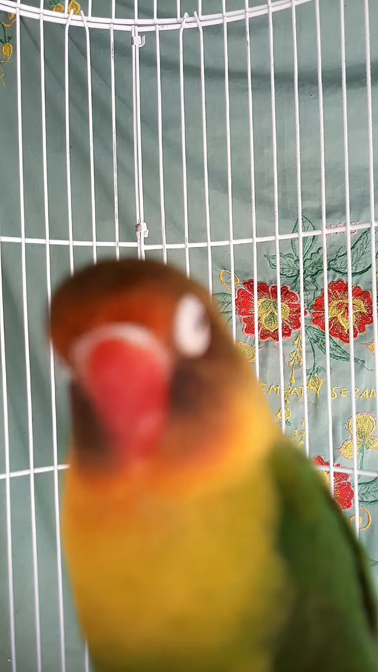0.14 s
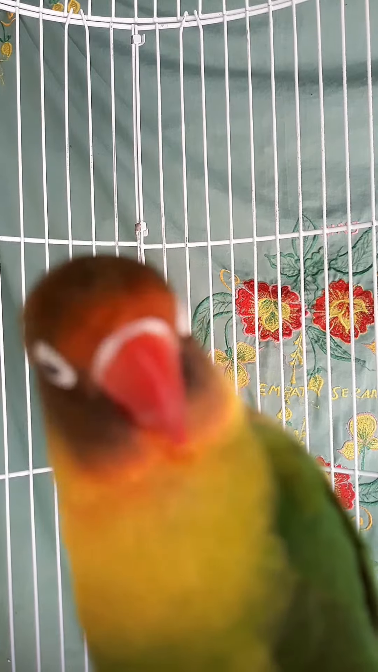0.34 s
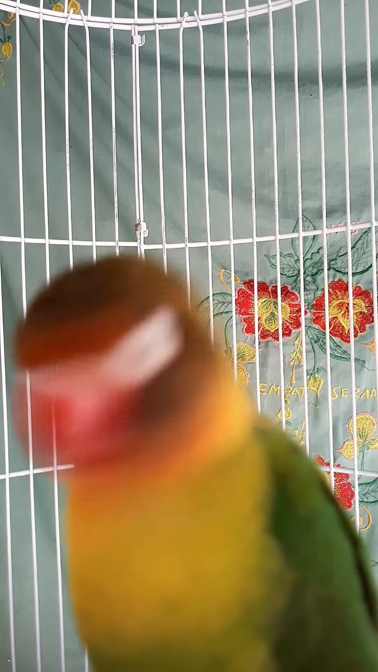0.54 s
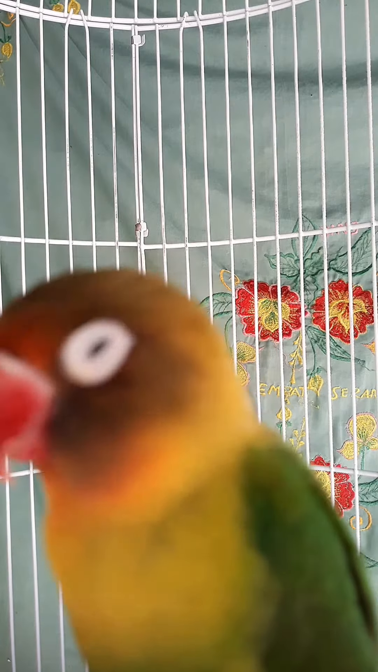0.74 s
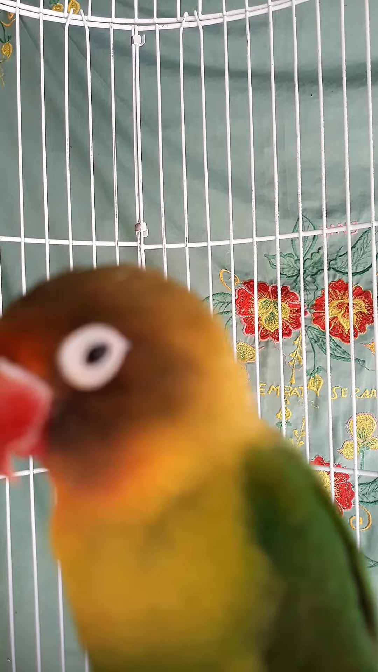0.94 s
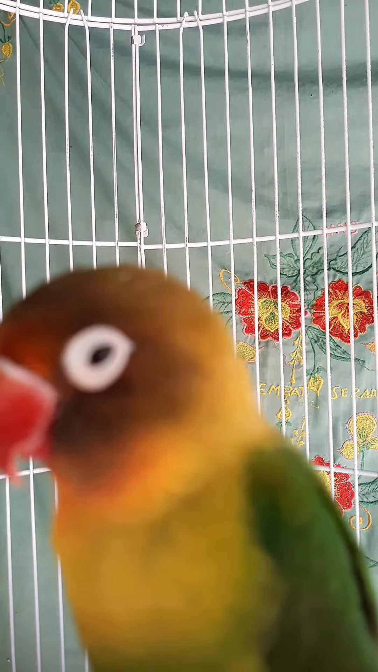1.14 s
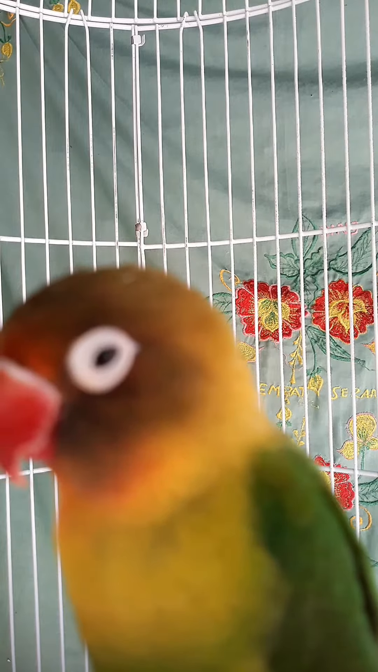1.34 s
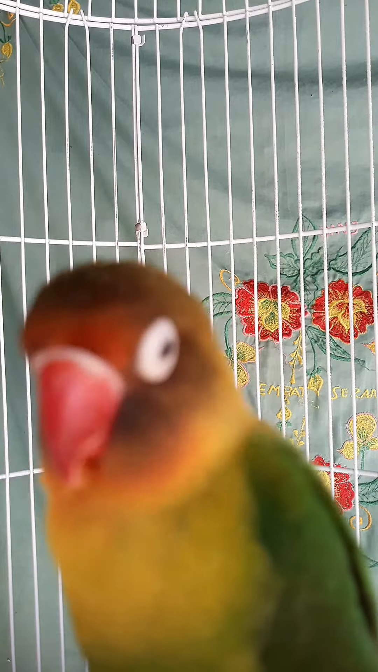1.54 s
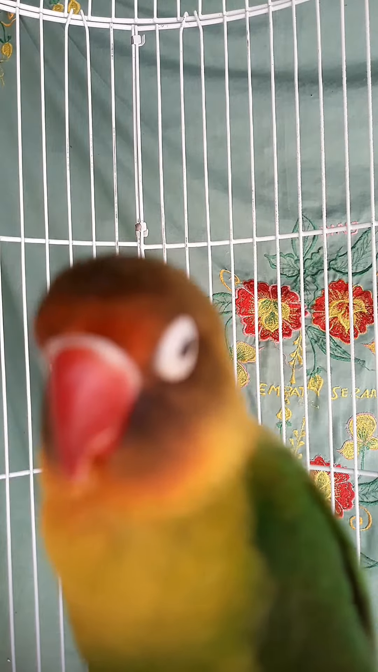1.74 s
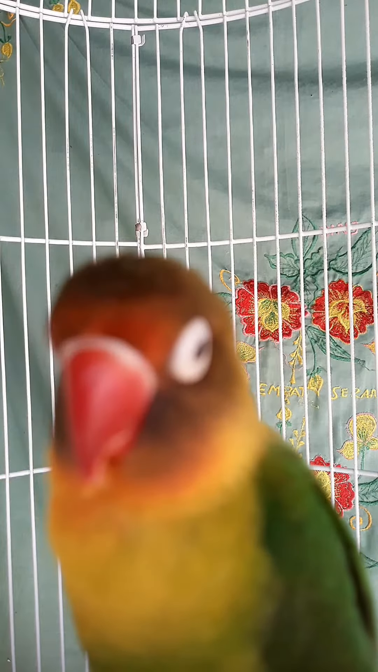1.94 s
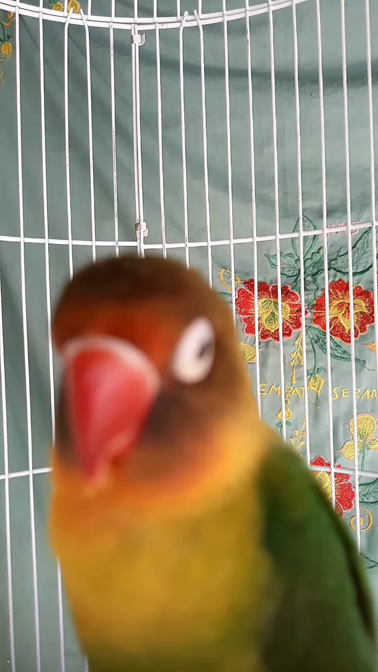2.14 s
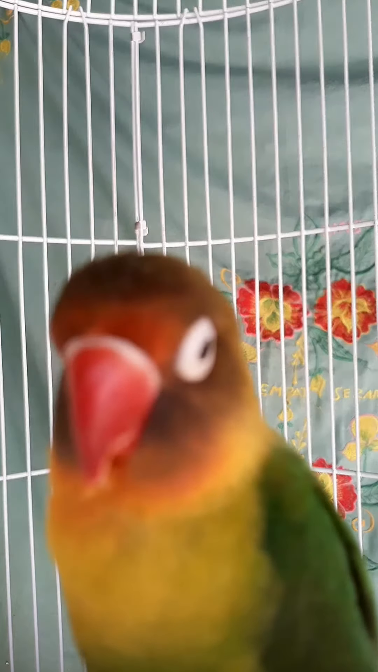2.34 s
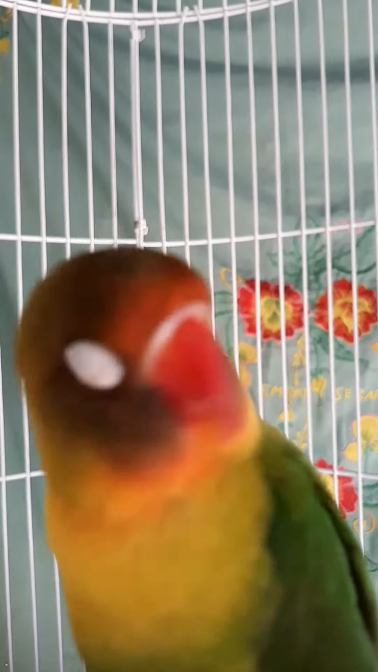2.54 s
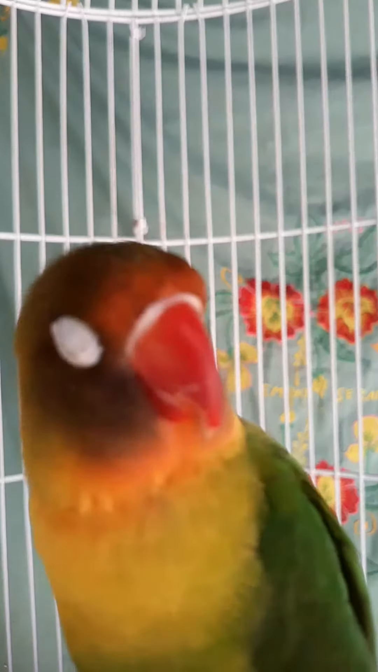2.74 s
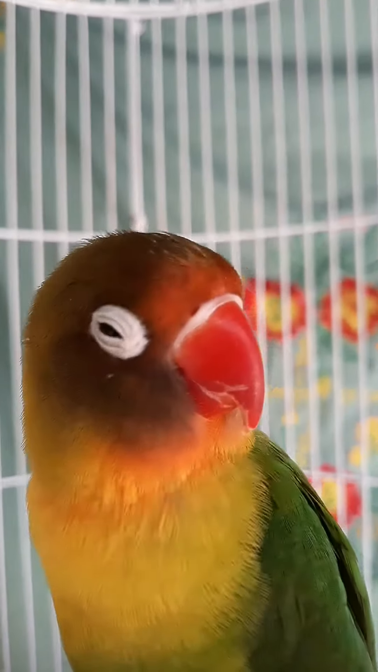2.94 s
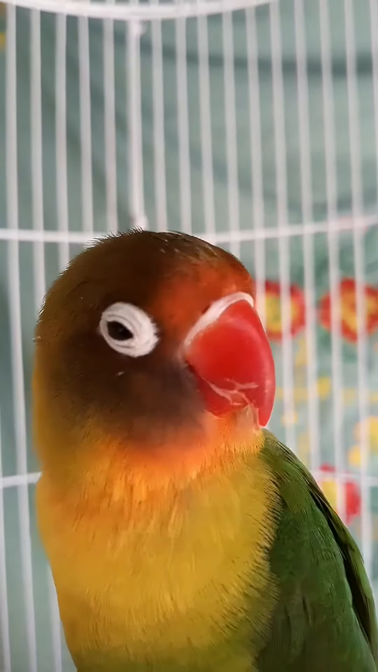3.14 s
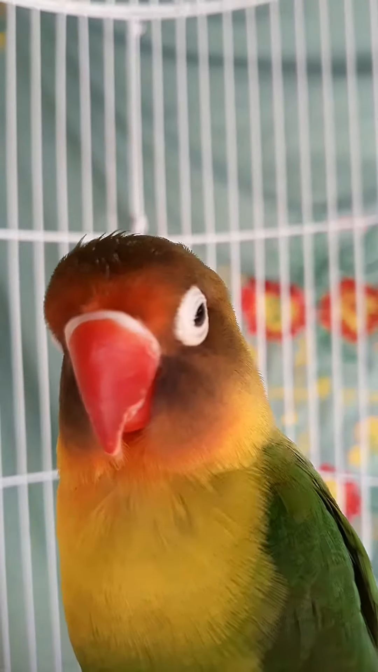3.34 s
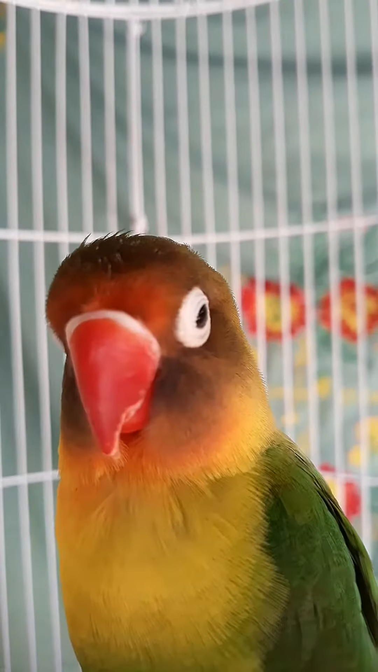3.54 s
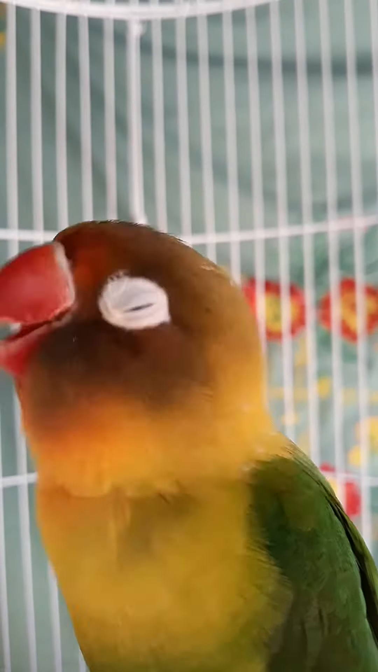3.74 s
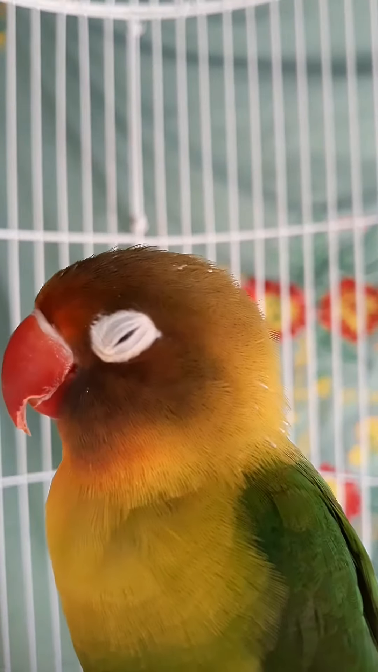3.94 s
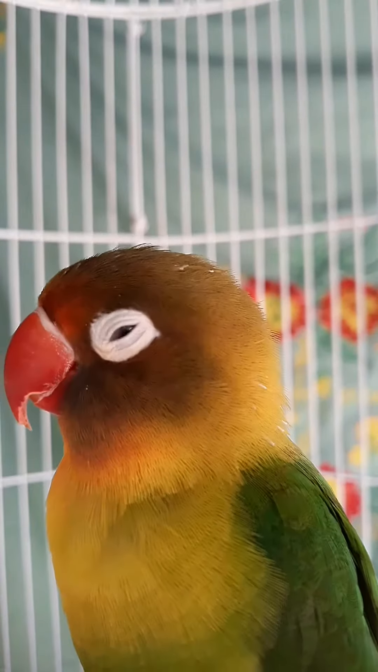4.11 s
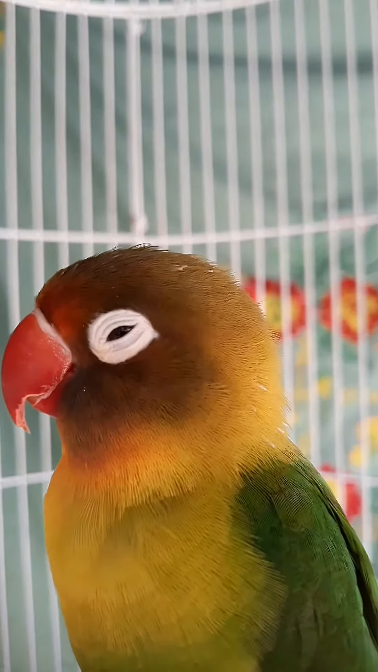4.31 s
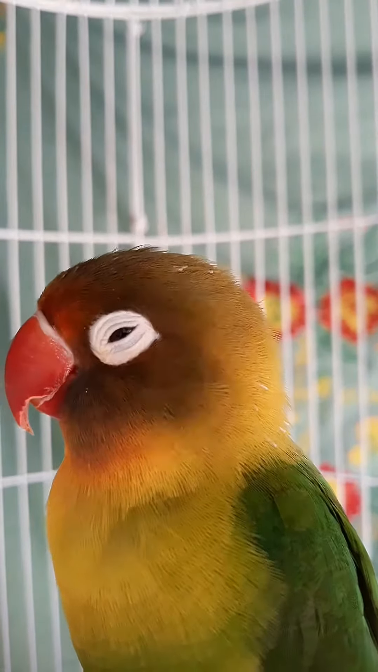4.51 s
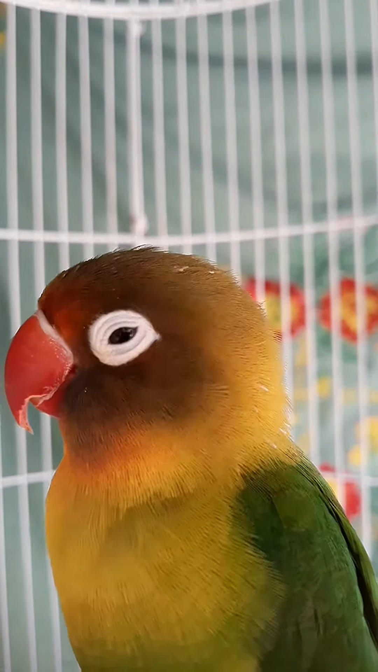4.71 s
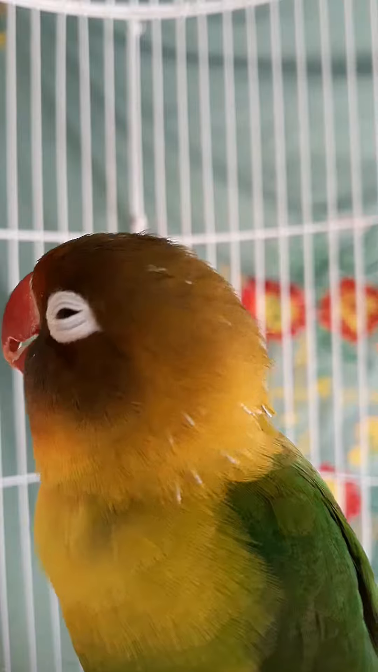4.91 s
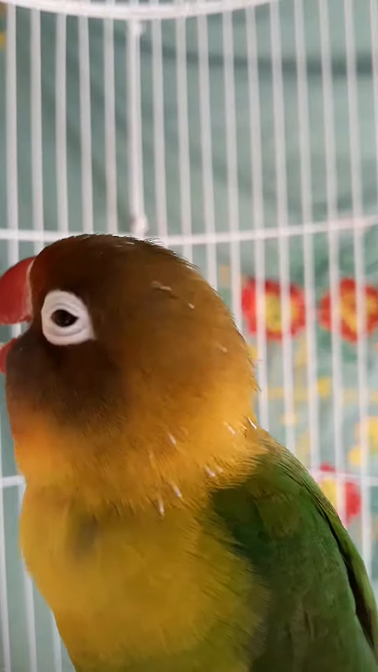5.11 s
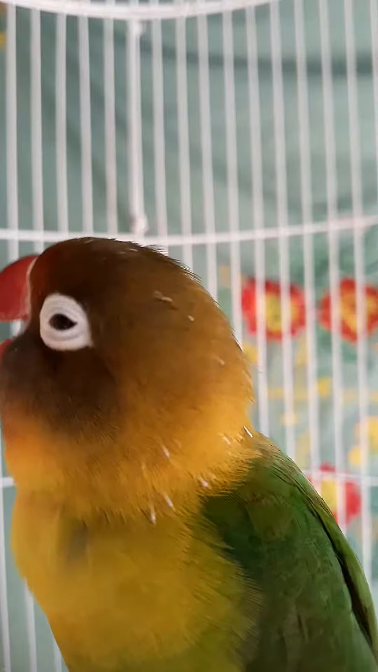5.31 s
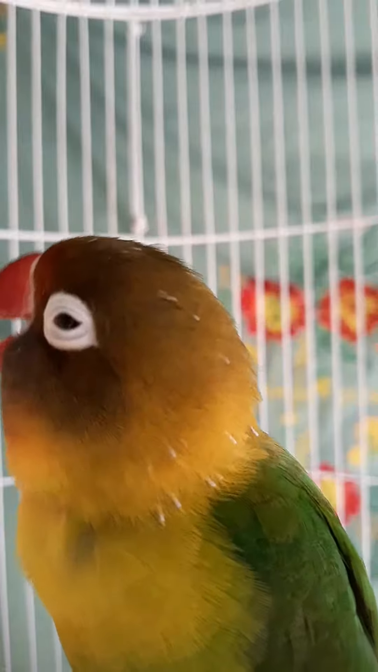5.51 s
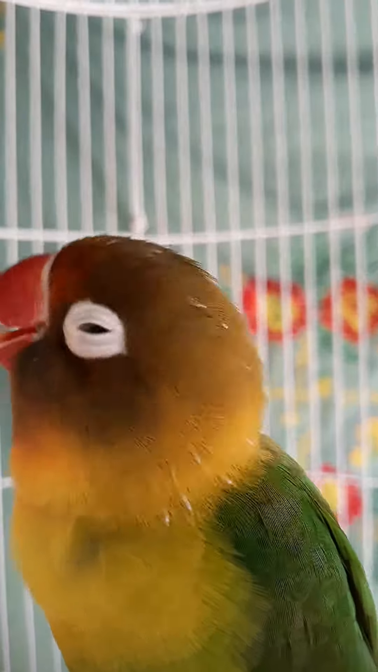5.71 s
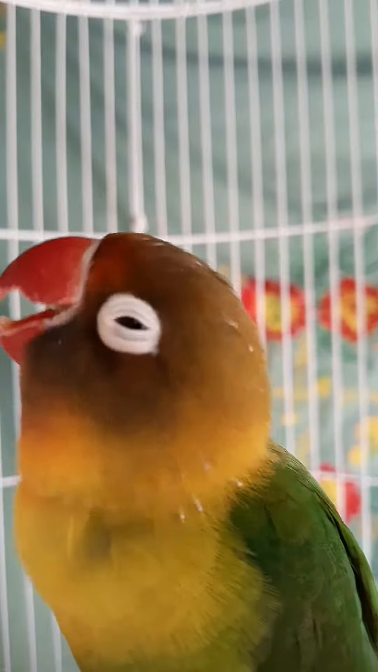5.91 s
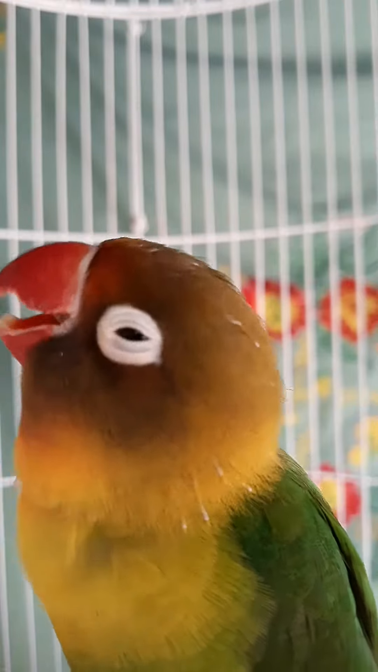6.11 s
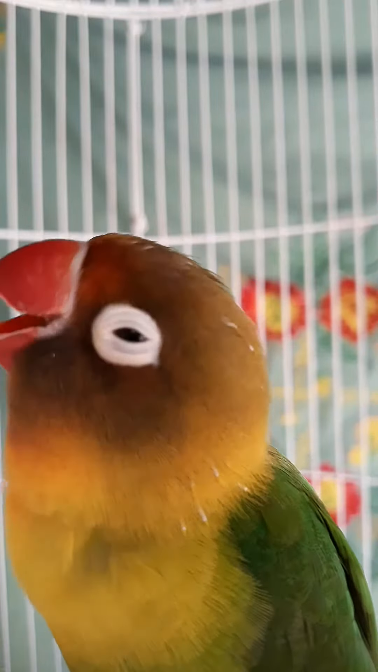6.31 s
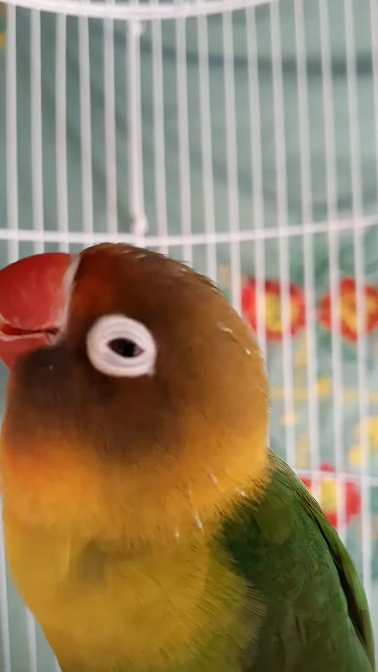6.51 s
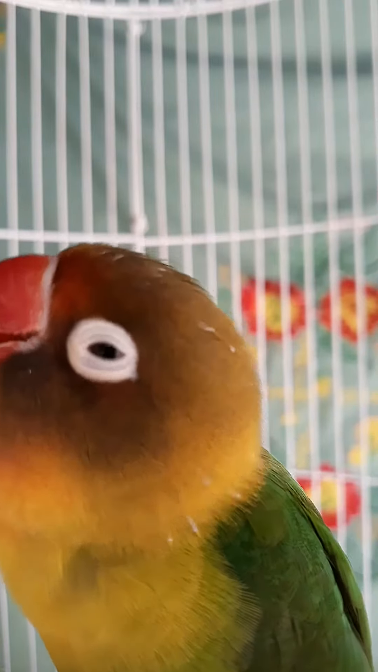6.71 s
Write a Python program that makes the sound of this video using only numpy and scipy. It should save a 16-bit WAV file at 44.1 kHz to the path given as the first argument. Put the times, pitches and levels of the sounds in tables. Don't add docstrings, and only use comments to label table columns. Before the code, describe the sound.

A small caged parrot calls right at the microphone, with short reflections off bars and cloth. Sharp whistled chirps, each about a twentieth of a second near 6 kHz, dipping then climbing, come at 0.7, 1.6 (softer), 2.6 (loudest) and 3.8 s. Behind them, very faint and echoey, distant birds whistle downward until about 4.5 s, a horn-like drone fades early, and dogs bark at 2.8 and 3.9 s. Thin insect tones, traffic rumble and breezy rustle continue; dull soft knocks fall near 1.3, 1.6, 2.1 and 3.7 s. At 4.85 s a squeaky leap leads into hard clicks, about sixteen per second. From 5.6 s they become a loud, rough trill alternating longer falling and shorter rising notes, about twenty-six notes per second. Around 6.65 s it breaks into ticks, ending abruptly with a bright rising chip at 6.8 s. Limiting flattens the calls and ducks the background.

```python
import sys
import numpy as np
from scipy import signal
from scipy.fft import rfft, irfft
from scipy.io import wavfile

SR = 44100
rng = np.random.default_rng(int(sys.argv[2]) if len(sys.argv) > 2 else 0)


def gain_from_db(level_db):
    decades = np.asarray(level_db, float) / 20
    return 10 ** decades


def digitize_waveform(pressure):
    field = np.atleast_2d(pressure).T
    bounded = np.clip(field, -1, 1)
    quanta = np.round(bounded * 32767).astype(np.int16)
    wavfile.write(sys.argv[1], SR, quanta)


N = 302526

# f/Hz, level/dB
THROAT = [(1300, -1.5), (2000, -15.5), (3000, -1.5), (4300, 7), (6000, -6.5), (8200, -9.5), (10000, -38),
          (12800, -15.5), (15500, -59)]
# f/Hz, level/dB
BEAK = [(1300, -31.5), (2600, -8), (4400, 8.5), (6000, 3), (9000, -12), (10300, -35), (13000, -7),
        (15500, -24)]


def parrot():
    voice = chirps() + rattle() + level_ticks() + falling_notes() + rising_notes()
    voice += long_notes() + last_note() + arch()
    port = signal.butter(3, [1250, 14500], "band", fs=SR, output="sos")
    overdrive_db = 11
    return gain_from_db(overdrive_db) * signal.sosfilt(port, voice)


def chirps():
    # t/s, peak level/dB, duration/ms, dip f/Hz, end f/Hz
    whistles = [
        (0.659, -0.5, 52.6, 5900, 6800),
        (1.6288, -6.5, 45, 5950, 6620),
        (2.622, 3, 53, 6030, 6420),
        (3.7722, -2.5, 48.4, 5600, 6750),
    ]
    # f/Hz, level re peak/dB, second voice level/dB
    openings = [
        (6564, -10.5, 0),
        (6283, -6, -3),
        (6250, -0.5, -2),
        (6210, -6, 3),
    ]
    dip_ms, climb_ms = 11.5, 20
    hook_hz, hook_ms = 300, 1.8
    low_ratio = 0.37
    out, air = np.zeros(N), coloured(BEAK, patchy_db=0)
    for (s, peak_db, length, dip_hz, end_hz), (open_hz, open_db, low_db) in zip(whistles, openings):
        ms = np.arange(int((length + 6) * SR / 1000)) * 1000 / SR
        since_dip = ms - dip_ms
        climb = end_hz + (dip_hz - end_hz) * np.exp(-since_dip / climb_ms)
        climb -= hook_hz * np.exp(-np.abs(since_dip) / hook_ms)
        fall = np.clip(since_dip / 2.5 + 1, 0, 1)
        hz = open_hz * (1 - fall) + climb * fall
        hz *= 1 + 0.008 * drift(210, count=len(ms))
        turns = 2 * np.pi * np.cumsum(hz) / SR
        whistle = np.sin(turns) + gain_from_db(-22 + 11 * ms / length) * np.sin(2 * turns)
        whistle *= gain_from_db(1.5 * drift(130, count=len(ms)))
        low_turns = 2 * np.pi * low_ratio * open_hz * ms / 1000
        beats = gain_from_db(-23) * np.sin(low_turns)
        beats += gain_from_db(-17.5) * np.sin(turns - low_turns)
        beats += gain_from_db(-27) * np.sin(turns + low_turns)
        beats *= np.clip((dip_ms - 2 - ms) / 1.5, 0, 1) * gain_from_db(low_db - 0.6 * ms)
        level_db = np.interp(ms, [0, 6, 9, 0.5 * length, length, length + 5],
                             [open_db, open_db, 0, -1, -6, -40])
        pop = gain_from_db(-9.5) * air[round(s * SR):][:len(ms)] * np.exp(-ms / 1.0)
        add(out, s, gain_from_db(peak_db) * (gain_from_db(level_db) * whistle + beats + pop))
    return out


def rattle():
    # t/s, peak level/dB, duration/ms, middle f/Hz
    click_rows = [(4.9893, -1.5, 3.5, 2247), (5.0495, 0, 4.9, 2050), (5.1111, -4, 3.9, 2041),
                  (5.176, -1.5, 3.8, 2610), (5.239, 0.5, 2.6, 2570), (5.3045, -1, 3.8, 2580),
                  (5.3708, 2.5, 7.9, 2293), (5.4356, -1, 6.8, 2350), (5.5074, 0.5, 4.3, 2386)]
    return calls(glides(click_rows, start=0.86, end=1.3), BEAK, count=6, turn=0.6, fade=0.1, rough=0.72,
                 pop_db=-5, pop_ms=1.86)


def level_ticks():
    # t/s, peak level/dB, duration/ms, middle f/Hz
    tick_rows = [
        (4.9261, -8, 3, 2620),
        (6.662, -13, 0.79, 1930),
        (6.6836, 1, 2, 1784),
        (6.7432, -13, 1.35, 1990),
        (6.771, 2, 3.7, 2149),
        (6.777, -1.5, 3.1, 2047),
    ]
    return calls(glides(tick_rows, start=1.03, end=0.99), THROAT, count=4, turn=0.57, fade=0.14, rough=0.64,
                 pop_db=-9, pop_ms=0.8)


def falling_notes():
    # t/s, peak level/dB, duration/ms, settled f/Hz, opening f/Hz
    down_rows = [(5.5807, -0.5, 8.7, 2200, 2410), (5.659, -3.5, 12, 2090, 2073),
                 (5.7362, -3, 6.8, 2230, 2514), (5.8096, -8, 13, 2000, 2937),
                 (5.8846, -0.5, 11, 2060, 2280), (5.9596, -0.8, 12, 2130, 2715),
                 (6.0314, 0.5, 18.5, 2160, 2490), (6.1171, -1, 14.4, 2082, 2460),
                 (6.196, -2, 9.9, 1970, 2220), (6.2739, 0, 8.9, 2020, 2080),
                 (6.3501, 1.5, 14.8, 1992, 2396), (6.4276, -2.5, 14.1, 2060, 2270),
                 (6.5129, 2, 19.4, 2140, 2305), (6.6024, 0, 11.4, 1900, 2495)]
    return calls(glides(down_rows, start=1, end=0.95), THROAT, count=7, turn=0.34, fade=0.14, rough=0.504,
                 pop_db=-10.0, pop_ms=0.43, ease=1.6, scoop=0.05)


def rising_notes():
    # t/s, peak level/dB, duration/ms, top f/Hz
    up_rows = [(5.6297, -3, 5.8, 1780), (5.709, -6, 4.4, 1687), (5.7841, -9, 2.9, 1774),
               (5.8564, 0.5, 5.9, 1922), (5.9302, 1, 5.8, 1896), (6.0072, -3, 8.5, 1844),
               (6.0908, -3, 4.4, 1850), (6.1669, -2, 5.1, 1895), (6.2468, -1.5, 6.1, 2045),
               (6.3227, -1, 4.52, 1900), (6.4007, -3, 6, 1720), (6.4836, -4.5, 7.8, 1790),
               (6.5734, 2, 3.7, 1980)]
    early = calls(glides(up_rows[:3], start=0.88, end=0.92), THROAT, count=8, turn=0.96, fade=0.2, rough=1.2,
                  pop_db=-18.5, pop_ms=1.7, rise_ms=0.39)
    later = calls(glides(up_rows[3:], start=0.9, end=1.06), THROAT, count=8, turn=0.87, fade=0.095, rough=0.62,
                  pop_db=-12.5, pop_ms=1.4, rise_ms=3.56, scoop=-0.14, ease=0.938)
    return early + later


def long_notes():
    # t/s, peak level/dB, duration/ms, settled f/Hz, opening f/Hz
    long_rows = [
        (4.854, -0.8, 9.4, 2570, 2505),
        (4.878, -4, 20, 2164, 2340),
        (6.690, 0.77, 17, 1990, 2990),
    ]
    return calls(glides(long_rows, start=1, end=0.95), THROAT, count=6, turn=0.58, fade=0.14, rough=0.55,
                 pop_db=-9, ease=2.2)


def last_note():
    # t/s, peak level/dB, duration/ms, settled f/Hz, opening f/Hz
    last_rows = [
        (6.779, 0, 11, 2443, 3020),
        (6.787, 1, 24, 2894, 2416),
    ]
    # f/Hz, level/dB
    open_beak = [(2000, -16), (2900, -9), (4600, -3), (5900, 3), (8600, -18.5), (10300, -32.5),
                 (12500, -15), (15500, -36)]
    return calls(glides(last_rows, start=1, end=1.01), open_beak, count=5, turn=0.55, fade=0.08, rough=0.3,
                 pop_db=-35, rise_ms=0.7, ease=1.5)


def arch():
    # t/s, peak level/dB, duration/ms, top f/Hz, opening f/Hz
    arch_rows = [
        (4.862, -2.5, 17.5, 6950, 3100),
    ]
    colour = [(2500, -3), (7200, 0), (10000, -30), (15000, -22)]     # f/Hz, level/dB
    return calls(glides(arch_rows, start=1, end=0.4), colour, count=2, turn=0.45, fade=0.1, rough=0.3,
                 pop_db=-40, rise_ms=1.5, ease=2.4)


def glides(rows, start, end):
    out = []
    for s, db, ms, hz, *opening in rows:
        open_hz = opening[0] if opening else hz * start
        out.append((s, db, ms, open_hz, hz, hz * end))
    return out


def calls(rows, colour, count, turn, fade, rough, pop_db, pop_ms=0.28, rise_ms=0.3, ease=1.3,
          waver_hz=500, scoop=0):
    out, air = np.zeros(N), coloured(colour, patchy_db=0, count=2 ** 15)
    for s, peak_db, ms, start_hz, turn_hz, end_hz in rows:
        size = int(ms * (1 + 3 * fade) * SR / 1000)
        part = np.arange(size) * 1000 / SR / ms
        before = np.clip(1 - part / turn, 0, 1)
        after = np.clip((part - turn) / (1 - turn), 0, 1)
        hz = turn_hz + (start_hz - turn_hz) * before ** ease + (end_hz - turn_hz) * after ** ease
        hz *= 1 + scoop * np.exp(-part * ms / 1.8)
        wobble = drift(waver_hz, count=6000)
        cycles = np.cumsum(hz * (1 + 0.034 * rough * np.resize(wobble, size))) / SR
        gains = [gain_from_db(at_hz(colour, k * hz)) for k in range(1, count + 1)]
        tone = sum(g * np.sin(2 * np.pi * (k + 1) * cycles + k) for k, g in enumerate(gains))
        tone = tone / np.sum(gains, axis=0) * gain_from_db(rough * np.resize(wobble[::-1], size))
        rise = np.minimum(part * ms / rise_ms, 1)
        shape = rise * np.exp(-np.maximum(part - 1 + fade, 0) / fade)
        burst = np.resize(np.roll(air, round(s * SR)), size)
        pop = gain_from_db(pop_db) * burst * np.exp(-part * ms / pop_ms)
        add(out, s, gain_from_db(peak_db) * (tone * shape + pop))
    return out


def echoes(x, near_db, far_db):
    cage_t60_s, room_t60_s = 0.038, 0.18
    hall_db, hall_t60_s = -17.5, 0.41
    t = np.arange(int(0.7 * SR)) / SR
    sparse = rng.standard_normal(len(t)) * (rng.random(len(t)) < 0.05) * (t > 0.0012)
    near = sparse * gain_from_db(-60 * t / cage_t60_s)
    dying = gain_from_db(-60 * t / room_t60_s) + gain_from_db(hall_db - 60 * t / hall_t60_s)
    dull = signal.lfilter([1], [1, -0.42], rng.standard_normal(len(t)))
    far = dull * dying * np.minimum(t / 0.0027, 1)
    tail = gain_from_db(near_db) * near / np.linalg.norm(near) + gain_from_db(far_db) * far / np.linalg.norm(far)
    return x + signal.fftconvolve(x, tail)[:N]


def distance():
    return echoes(far_birds() + far_barks() + drones(), near_db=-5.5, far_db=-1.5)


def far_birds():
    # t/s, peak level/dB, duration/ms, start f/Hz, end f/Hz
    bird_rows = [(.01, -53, 190, 4310, 2900), (.19, -56, 36, 4040, 3810), (.44, -48.5, 195, 3780, 2560),
                 (.73, -58, 97, 3430, 3586), (.84, -50.5, 193, 4007, 2457), (1.21, -54, 183, 4200, 2950),
                 (2.35, -49, 203, 4150, 2420), (2.73, -49, 177, 4060, 2455), (3.05, -57.5, 150, 4200, 3220),
                 (3.47, -46.5, 216, 4260, 2454), (3.85, -43.5, 210, 4120, 2450),
                 (4.06, -52.5, 50, 2850, 2850), (.44, -55.5, 93, 4170, 3340), (.83, -54, 64, 3720, 3850),
                 (2.35, -52.5, 100, 3750, 3270), (3.5, -51, 66, 3750, 3680), (4.24, -53, 91, 3290, 3204),
                 (4.38, -54.5, 124, 4120, 3030), (4.4, -54, 80, 3010, 2750)]
    fall_halfway = 0.62
    falls = [(s, db, ms, a, a + fall_halfway * (b - a), b) for s, db, ms, a, b in bird_rows]
    colour = [(2000, 0), (4500, 1.5), (5000, -15), (9500, -8.5)]     # f/Hz, level/dB
    return calls(falls, colour, count=2, turn=0.5, fade=0.087, rough=0.55, pop_db=-22.5, pop_ms=59,
                 rise_ms=7.5, ease=1.5, waver_hz=40.0)


def far_barks():
    # t/s, peak level/dB, duration/ms, lowest partial f/Hz
    bark_rows = [
        (2.79, -42.5, 59, 600),
        (3.86, -41.5, 67, 592),
        (3.98, -50, 85, 495),
    ]
    colour = [(400, -3), (1200, 0), (2000, -16)]     # f/Hz, level/dB
    return calls(glides(bark_rows, start=1.01, end=0.94), colour, count=3, turn=0.5, fade=0.2, rough=1.5,
                 pop_db=-5, pop_ms=40, rise_ms=8)


def drones():
    # t/s, peak level/dB, duration/ms, lowest partial f/Hz
    drone_rows = [
        (0, -55, 400, 376),
        (.5, -66, 550, 414),
        (2.95, -65.5, 181, 574),
    ]
    colour = [(350, -11.5), (750, -7.0), (1150, -7.5), (1500, 2.5), (1900, -24.5)]     # f/Hz, level/dB
    return calls(glides(drone_rows, start=1, end=0.985), colour, count=4, turn=0.89, fade=0.5, rough=0.16,
                 pop_db=-39, rise_ms=8)


def insects():
    # t/s, level/dB
    high_insect = [(.119, -58.5), (.62, -62.5), (.9, -59), (1.43, -55.5), (2.089, -56.5), (2.706, -59),
                   (3.199, -58.5), (3.75, -61), (4.214, -59.5), (4.697, -56.5), (5.377, -74), (6.1, -62)]
    # t/s, level/dB
    low_insect = [(.26, -57), (1.27, -56.5), (2.192, -61), (3.152, -56.5), (4.146, -57.5)]
    # f/Hz, bandwidth/Hz, level/dB
    chorus = [
        (3150, 120, -60),
        (5920, 170, -63),
        (12240, 650, -68),
        (79, 6.9, -63.5),
        (120.7, 34, -59.5),
    ]
    out, t = np.zeros(N), np.arange(N) / SR
    phrases = [row + (0.5, 6410, 6280) for row in high_insect]      # duration/s, start f/Hz, end f/Hz
    phrases += [row + (0.49, 6110, 5980) for row in low_insect]
    for s, level_db, length, start_hz, end_hz in phrases:
        part = np.linspace(0, 1, int(length * SR))
        turns = 2 * np.pi * np.cumsum(start_hz + (end_hz - start_hz) * part) / SR
        strokes = 1 + 0.15 * np.sin(turns / 18.0)
        tone = np.sin(turns) + gain_from_db(0.5) * np.sin(2 * turns)
        add(out, s, gain_from_db(level_db) * np.sin(np.pi * part) ** 0.6 * strokes * tone)
    out *= gain_from_db(2.5 * drift(40))
    for hz, width_hz, level_db in chorus:
        band = signal.butter(2, [hz - width_hz / 2, hz + width_hz / 2], "band", fs=SR, output="sos")
        swarm = rms_one(signal.sosfilt(band, rng.standard_normal(N)))
        out += gain_from_db(level_db + 1.2 * drift(3.3)) * swarm
    return out


def surroundings():
    # t/s, level/dB
    breeze = [(0, -57.5), (.5, -56.5), (.85, -61), (1.2, -56.5), (1.5, -56.5), (1.59, -48), (1.68, -57),
              (1.93, -55.5), (2.14, -45.5), (2.41, -55.5), (2.68, -57.5), (2.79, -43.5), (2.95, -55),
              (3.28, -49), (3.53, -56), (3.72, -53), (4.37, -56.5), (4.84, -56)]
    # t/s, level/dB
    traffic = [(0, -47), (.9, -47.5), (1.4, -43), (1.7, -50), (2.05, -42), (2.9, -46.5), (3.8, -51),
               (4.7, -43), (4.9, -46.5)]
    # f/Hz, spectral level/dB
    rumble_colour = [(15, -71), (30, -35.5), (48, -27), (62, -10), (81, -0.5), (125, 4.5), (161, -12.5),
                     (200, -10.5), (260, -22), (340, -46), (570, -120)]
    # f/Hz, spectral level/dB
    rustle_colour = [(150, -7), (250, 4), (500, -1.5), (900, -6.5), (1500, -13.5), (2300, -24),
                     (3000, -37.5)]
    # f/Hz, spectral level/dB
    hiss_colour = [(1800, -12.5), (2800, 0.5), (4200, 4.5), (6000, -0.5), (8500, -3.5), (10000, -18),
                   (12500, -18), (15000, -10.5), (16500, -20)]
    still_db, hiss_db, hiss_follows = -55, -63, 0.42
    breeze_db = in_time(breeze)
    out = gain_from_db(in_time(traffic)) * coloured(rumble_colour, patchy_db=2.5)
    out += gain_from_db(breeze_db) * coloured(rustle_colour, patchy_db=3.5)
    hiss = gain_from_db(hiss_db + hiss_follows * (breeze_db - still_db))
    out += hiss * gain_from_db(5.5) * coloured(hiss_colour, patchy_db=2.0)
    return out + knocks()


def knocks():
    # t/s, peak level/dB, f/Hz
    bumps = [
        (1.334, -45.5, 194.7),
        (1.573, -34.5, 285.3),
        (2.078, -38.5, 146),
        (3.721, -49, 150.6),
    ]
    out, t = np.zeros(N), np.arange(int(0.12 * SR)) / SR
    envelope = np.sin(np.pi * t / 0.12) ** 2 * gain_from_db(-200 * t + 15.5)
    for s, peak_db, hz in bumps:
        add(out, s, gain_from_db(peak_db) * np.sin(2 * np.pi * hz * t + drift(80, count=len(t))) * envelope)
    return out


def coloured(spectrum, patchy_db, count=N):
    hz = np.fft.rfftfreq(count, 1 / SR) + 1
    shaped = rfft(rng.standard_normal(count)) * gain_from_db(at_hz(spectrum, hz))
    if not patchy_db:
        return rms_one(irfft(shaped, count))
    band = np.round(2 * np.log2(hz)).astype(int) % 4
    return rms_one(sum(irfft(shaped * (band == k), N) * gain_from_db(patchy_db * drift(27)) for k in range(4)))


def drift(rate, count=N):
    r = np.exp(-2 * np.pi * rate / SR)
    noise = rng.standard_normal(count + 9000)
    return rms_one(signal.lfilter([1], [1, -2 * r, r * r], noise)[9000:])


def rms_one(x):
    return x / np.sqrt(np.mean(x ** 2) + 1e-20)


def at_hz(points, hz):
    point_hz, point_db = np.array(points).T
    return np.interp(np.log(hz), np.log(point_hz), point_db, left=-90, right=-90)


def in_time(rows):
    return np.interp(np.arange(N) / SR, *np.transpose(rows))


def add(out, s, sound):
    i = round(s * SR)
    out[i:i + len(sound)] += sound[:N - i]


def scene():
    bird = echoes(parrot(), near_db=-7, far_db=-19.5)
    return (bird + distance() + insects() + surroundings())[None]


def low_pass(x):
    return signal.sosfilt(signal.butter(12, 16430, fs=SR, output="sos"), x)


def record(dry):
    ceiling_db, release_db_s, look_ahead = 1.5, 93, 30
    slow_duck, slow_s = 0.14, 0.53
    top = 0.9
    over_db = np.maximum(20 * np.log10(np.abs(dry[0]) + 1e-9) - ceiling_db, 0)
    ramp = release_db_s * np.arange(N) / SR
    held_db = np.maximum.accumulate(over_db + ramp) - ramp
    held_db = np.roll(signal.lfilter([0.05], [1, 0.05 - 1], held_db), -look_ahead)
    keep = np.exp(-1 / (slow_s * SR))
    held_db += slow_duck * signal.lfilter([1 - keep], [1, -keep], held_db)
    limited = np.clip(dry * gain_from_db(-held_db), -top, top)
    limited = signal.sosfilt(signal.butter(2, 45, "high", fs=SR, output="sos"), limited)
    mix = signal.sosfilt(signal.cheby2(14, 90, 16800, fs=SR, output="sos"), limited)
    return low_pass(mix)


dry = scene()
out = record(dry)
digitize_waveform(out)
```